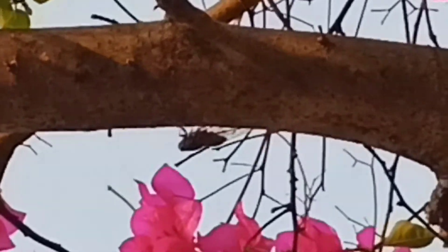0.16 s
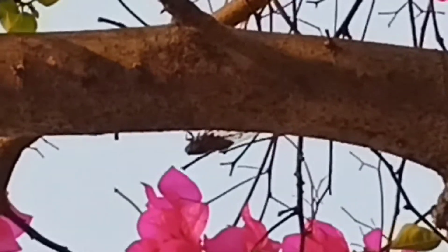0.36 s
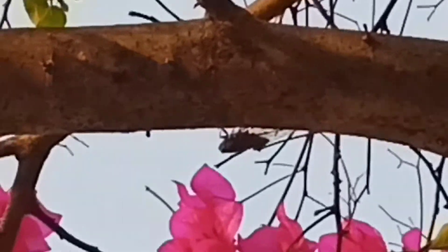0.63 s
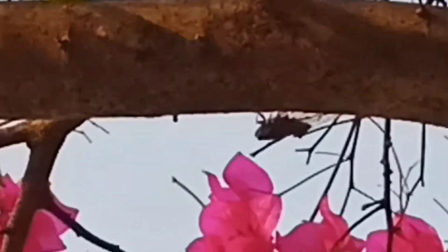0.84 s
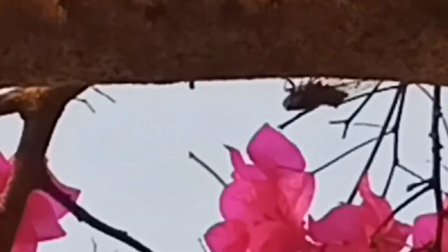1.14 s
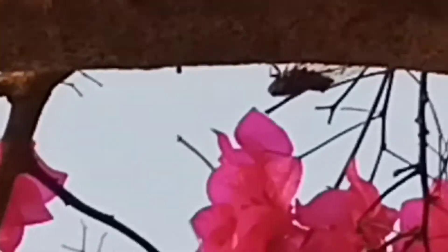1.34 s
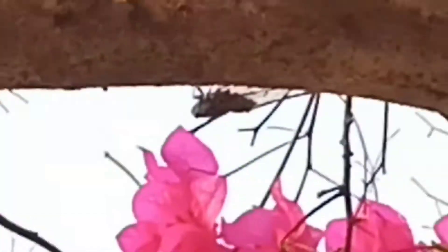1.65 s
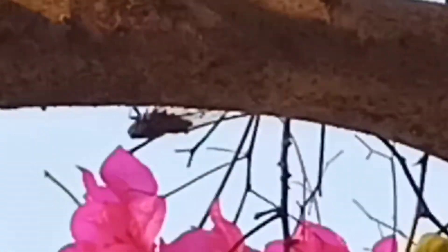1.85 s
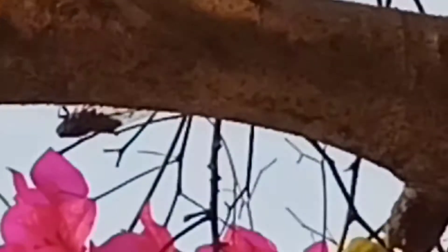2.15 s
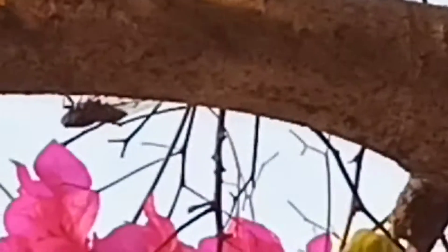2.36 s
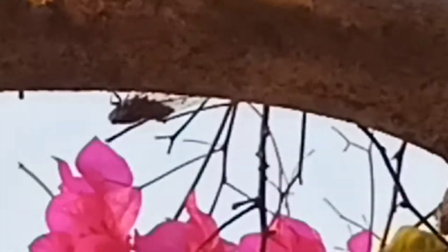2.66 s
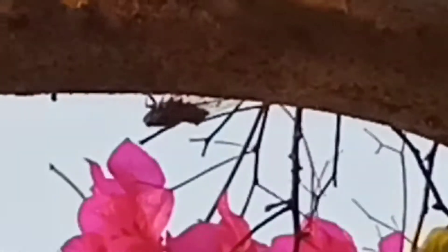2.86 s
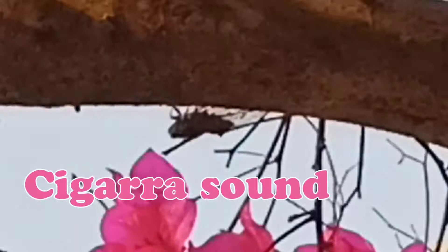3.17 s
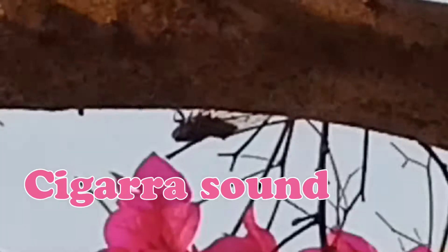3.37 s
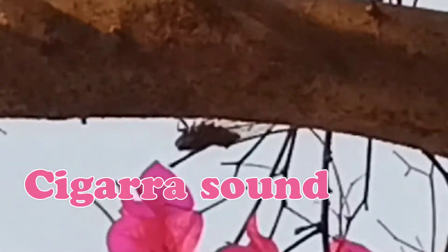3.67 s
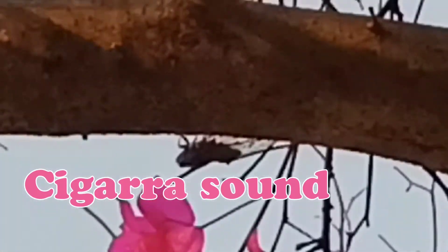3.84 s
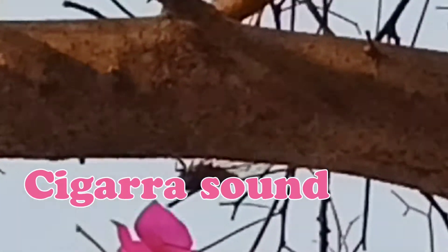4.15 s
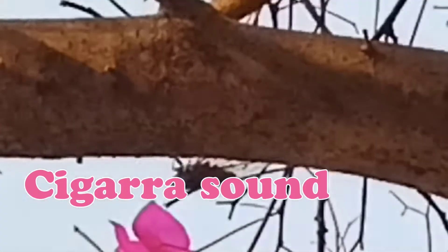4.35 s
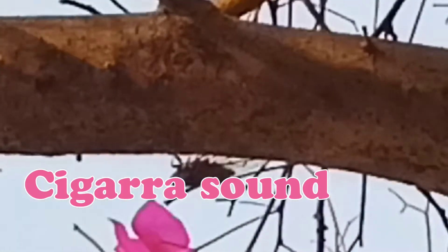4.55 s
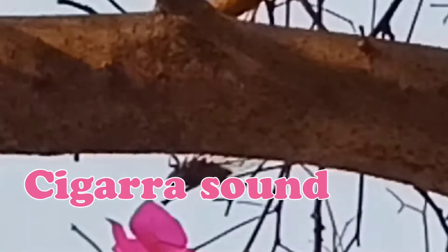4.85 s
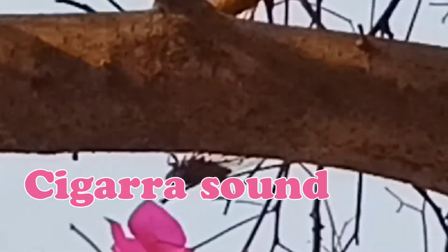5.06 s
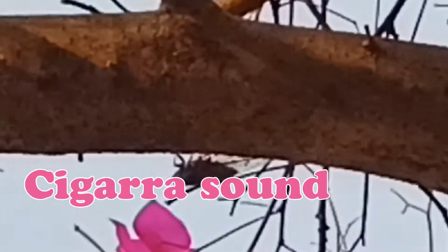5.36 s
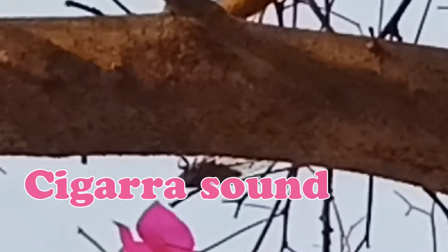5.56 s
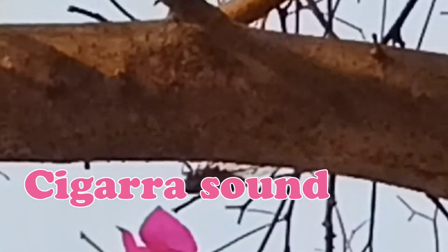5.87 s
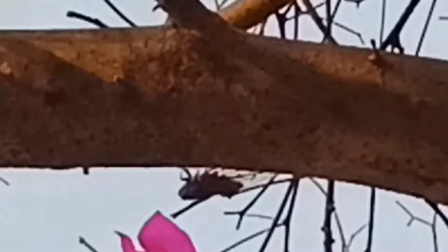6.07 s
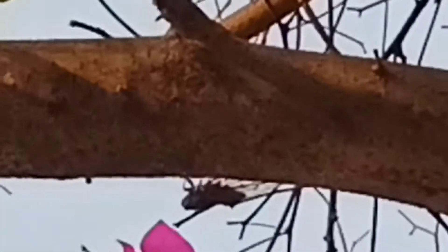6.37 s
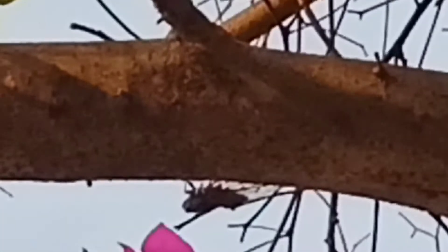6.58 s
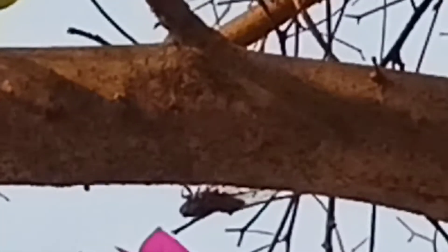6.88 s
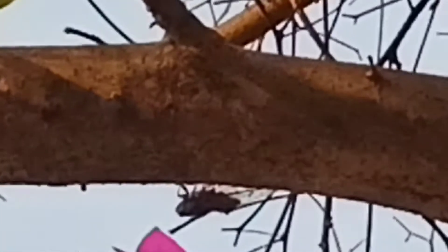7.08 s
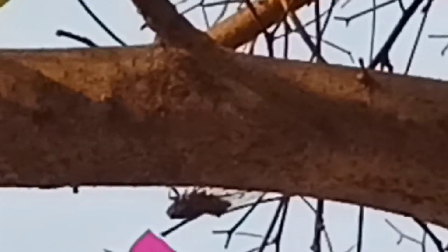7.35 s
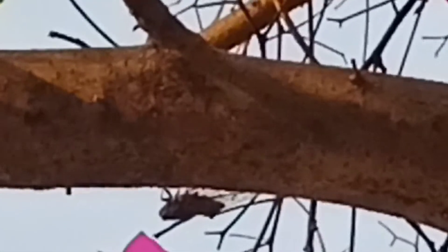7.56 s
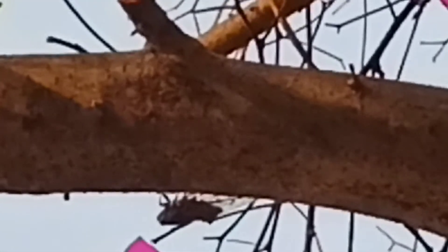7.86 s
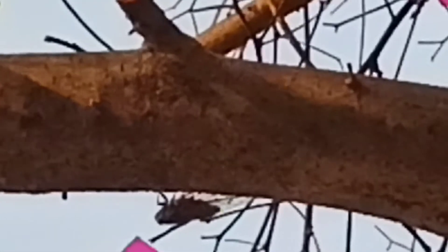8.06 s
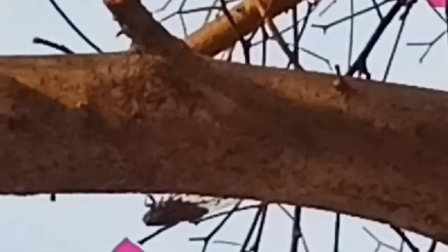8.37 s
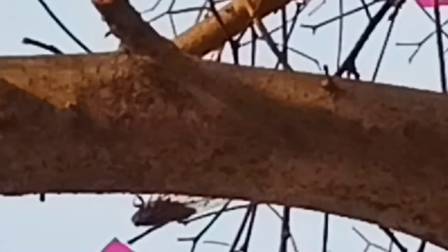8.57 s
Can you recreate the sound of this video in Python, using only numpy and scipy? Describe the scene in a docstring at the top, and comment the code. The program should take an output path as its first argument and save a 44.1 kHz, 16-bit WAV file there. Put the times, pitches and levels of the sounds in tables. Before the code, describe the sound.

A cicada buzzes loudly up close, a high metallic whine growing rougher and throbbing, while a faint small engine approaches far behind.

```python
"""A cicada sings under a branch, close to a mono microphone. Its tymbals buckle rib by rib about
440 times a second and ring the hollow abdomen: first a smooth whine, then ever rougher as the
abdomen throbs and swings the brightness of the buzz. Far behind are a faint drone, a few ticks,
two falling bird whistles, soft rasps, and a small engine that comes nearer along a road."""
import sys
import numpy as np
from scipy import signal
from scipy.fft import rfft, irfft, next_fast_len
from scipy.io import wavfile
from scipy.ndimage import uniform_filter1d, map_coordinates

SR = 44100
rng = np.random.default_rng(int(sys.argv[2]) if len(sys.argv) > 2 else 0)


def store_pcm(level_fs):
    """Save levels as 16-bit WAV."""
    pcm = np.round(np.clip(level_fs, -1, 1) * 32767).astype(np.int16)
    wavfile.write(sys.argv[1], SR, np.atleast_2d(pcm).T)


N = 384552
TIME = np.arange(N) / SR


def amp(db):
    """Decibels to gain."""
    return 10 ** (np.asarray(db) / 20)


def unit(x):
    """x at rms 1."""
    return x / np.sqrt(np.mean(x ** 2) + 1e-20)


def steady(x, size=6000):
    """x with its level ridden to rms 1 over a window of size samples."""
    return x / np.sqrt(np.abs(uniform_filter1d(x ** 2, size)) + 1e-20)


def along(points, hz):
    """(Hz, value) points read on a log frequency axis."""
    point_hz, values = np.transpose(points)
    return np.interp(np.log(hz + 1), np.log(point_hz), values)


def curves(rows):
    """One automation curve for each column after the time."""
    times, *columns = np.transpose(rows)
    return [np.interp(TIME, times, column) for column in columns]


def wobble(rate):
    """A smooth random curve, rate knots a second."""
    knots = rng.standard_normal(int(N * rate / SR) + 4)
    return map_coordinates(knots, [np.arange(N) * rate / SR])


def filtered(x, response):
    """x through an EQ whose gain is response(hz)."""
    size = next_fast_len(N + SR // 2)
    return irfft(rfft(x, size) * response(np.fft.rfftfreq(size, 1 / SR)), size)[..., :N]


def noise(colour):
    """Noise of rms 1 with a (Hz, dB) colour."""
    return unit(filtered(rng.standard_normal(N), lambda hz: amp(along(colour, hz))))


def clicks(at, gains, order=8):
    """Impulses at fractional sample positions."""
    taps = np.floor(at)[:, None] + np.arange(1 - order, order + 1)
    offset = taps - at[:, None]
    shape = np.sinc(offset) * np.cos(np.pi * offset / (2 * order)) ** 2
    slots = np.clip(taps, 0, N).astype(int)
    return np.bincount(slots.ravel(), (gains[:, None] * shape).ravel(), N + 1)[:N]


def tymbal(cycles, rib_hz, strain, slip_s=50e-6, smooth_jitter_s=9e-6, rough_jitter_s=50e-6):
    """Each cycle buckles the ribs one after another; strain makes their timing ragged."""
    # the ribs in buckling order: (smooth level [dB], strained level [dB])
    ribs = [(1, 2), (-1, -10), (-4, -6.5), (-1, -9), (-15, -2.5)]
    smooth_db, strained_db = np.transpose(ribs)
    onsets = np.interp(np.arange(1, int(cycles[-1])), cycles, np.arange(N))
    i = onsets.astype(int)
    rough = strain[i, None]
    shape = (len(i), len(ribs))
    slip = slip_s * (1 + rough) * rng.standard_normal((len(i), 1))
    jitter = (smooth_jitter_s + rough_jitter_s * rough ** 2) * rng.standard_normal(shape)
    delay_s = np.arange(len(ribs)) / rib_hz[i, None] + slip + np.cumsum(jitter, axis=1)
    click_db = smooth_db + (strained_db - smooth_db) * np.sqrt(rough) + 1.35 * rng.standard_normal(shape)
    return clicks((onsets[:, None] + SR * delay_s).ravel(), amp(click_db).ravel())


def abdomen_ring(x, size=2048):
    """The hollow abdomen rings after each click."""
    # how the abdomen radiates: (frequency [Hz], gain [dB])
    body = [(3600, -42.5), (4150, -34), (4600, -28.5), (4800, -20.5), (5050, -10), (5450, -5), (6200, -1.5),
            (6750, 0.5), (7250, 2.5), (7650, 1), (8100, 3), (8500, 0), (9200, -2.5), (9700, -11),
            (10100, -11), (10600, -24), (13000, -39)]
    cepstrum = irfft(np.log(amp(along(body, np.fft.rfftfreq(size, 1 / SR))) + 1e-6))
    # minimum phase, so nothing rings ahead of its click
    cepstrum[1:size // 2] *= 2
    cepstrum[size // 2 + 1:] = 0
    return signal.fftconvolve(x, irfft(np.exp(rfft(cepstrum))))[:N]


def abdomen_opening(x, open_db, strain, size=256, whine_width_hz=200):
    """Opening the abdomen tilts the buzz brighter; under strain the whole tilt sits lower in pitch."""
    # how far each band follows the opening: (frequency [Hz], share [signed ratio])
    tilt = [(5200, -0.38), (6000, -0.34), (7000, -0.64), (8100, 0.06), (8700, -0.049), (9200, 0.56),
            (10100, 0.98), (10900, 0.88), (11800, 0.077)]
    # a narrow resonance sliding with the abdomen's tension: (time [s], centre [Hz], lift [dB])
    whine = [(0.1, 9450, 2), (.3, 9350, 2.5), (1.52, 9130, 3), (1.68, 8850, -3), (2.05, 8655, 2.5),
             (2.4, 7900, 2.5), (4.6, 8596, 3), (5.5, 8600, 2), (8.72, 8466, 3.5)]
    whine_hz, whine_db = curves(whine)
    hz, times, bands = signal.stft(x, SR, nperseg=size)
    i = np.minimum(times * SR, N - 1).astype(int)
    sag = 1 + 0.11 * strain[i] ** 3
    eq_db = open_db[i] * along(tilt, hz[:, None] * sag)
    eq_db += whine_db[i] * np.exp(-((hz[:, None] - whine_hz[i]) / whine_width_hz) ** 2)
    return signal.istft(bands * amp(eq_db), SR, nperseg=size)[1][:N]


def twig_scatter(x, size=256, tail_frames=16):
    """Branch and twigs diffuse a sound: the energy in each band lingers briefly as noise."""
    # decay in the tree: (frequency [Hz], time to fall 60 dB [s])
    decay_times = [(500, .08), (5000, 0.052), (15000, 0.062)]
    hz, times, bands = signal.stft(x, SR, nperseg=size)
    tail = amp(-60 * times[:tail_frames] / along(decay_times, hz)[:, None]) ** 2
    tail /= tail.sum(axis=1, keepdims=True)
    energy = signal.fftconvolve(np.abs(bands) ** 2, tail, axes=1)[:, :len(times)]
    wash = signal.stft(rng.standard_normal(N), SR, nperseg=size)[2]
    return signal.istft(np.sqrt(np.abs(energy)) * wash / wash.std(), SR, nperseg=size)[1][:N]


def through_tree(x):
    """About half of the lower buzz arrives scattered; the upper buzz is mostly direct."""
    # the tree's wet mix: (frequency [Hz], scattered energy [share])
    scattered = [(5000, 0.52), (7000, 0.37), (8500, 0.14), (10000, 0.13)]
    direct = filtered(x, lambda hz: np.sqrt(1 - along(scattered, hz)))
    return direct + filtered(twig_scatter(x), lambda hz: np.sqrt(along(scattered, hz)))


def branch_colour(x):
    """Fixed reflections from the branch colour the buzz with narrow peaks and dips."""
    # peaks and dips: (centre [Hz], width [Hz], gain [dB])
    resonances = [(6550, 45, 2.5), (6700, 90, -7.5), (6730, 37, 5), (7240, 36, 2), (7800, 90, 1),
                  (7710, 80, 2), (8010, 45, 3), (8420, 120, -4.5), (8630, 82, 3), (9070, 55, -3),
                  (9060, 44, 3.5), (9530, 40, 3), (9730, 120, -2.5), (10060, 44, 3.5), (11030, 75, 8.5)]
    peak = lambda hz, centre, width: 1j * hz * width / (centre ** 2 - hz ** 2 + 1j * hz * width)
    eq = lambda hz: 1 + sum((amp(db) - 1) * peak(hz, centre, width) for centre, width, db in resonances)
    return filtered(x, eq)


def sizzle(buzz, throb_phase, strain, edge_db=-22, strain_lift_db=5, spit_db=-19.5):
    """The clicks carry a dry sizzle; strain adds two spits a throb, as the abdomen closes and reopens."""
    # dry edge of the clicks: (frequency [Hz], level [dB])
    edge_colour = [(7000, -30), (10500, -3), (12300, 1.5), (13500, 3.5), (14400, 6), (15500, -2)]
    # thin spit of hard-strained tymbals: (frequency [Hz], level [dB])
    spit_colour = [(11000, -31), (12900, -10), (13500, 0), (13950, -7), (15500, -11.5)]
    grain = np.abs(uniform_filter1d(buzz ** 2, size=12)) ** 0.25
    edge_gain = amp(edge_db + strain_lift_db * strain + wobble(45))
    edge = edge_gain * steady(noise(edge_colour) * steady(grain, size=600))
    spit_gate = np.exp(-((np.cos(throb_phase + 0.15) - 0.46) / 0.38) ** 2)
    return edge + amp(spit_db) * strain ** 4 * unit(noise(spit_colour) * grain * spit_gate)


def cicada(rib_ratio=5.43, rib_drag=0.71, bend_hz=8, pump=0.46, snap=0.29, hum_db=-42):
    """Rib clicks ring the abdomen, whose throb bends their rate, level and colour as strain grows."""
    # tymbal buckling: (time [s], cycle rate [Hz])
    buckling = [(0, 448), (0.5, 433), (1.95, 420.5), (3.25, 443.5), (3.9, 446), (5, 443.5), (5.8, 447),
                (6.3, 454.5), (8.72, 456)]
    # pumping of the abdomen: (time [s], throb rate [Hz])
    throbs = [(0, 17.9), (0.6, 23.65), (1.5, 23.16), (2.2, 23.44), (2.7, 26.81), (3.4, 24.55), (4.3, 24.49),
              (5.4, 19.68), (6.2, 21.13), (7.2, 21.74), (8, 20.06), (8.72, 21.69)]
    # effort of the song: (time [s], level [dB], strain [0-1])
    effort = [(0, -17.5, .72), (.19, -19, .6), (.32, -16.5, .3), (.65, -15.5, 0.21), (1.5, -17, .15),
              (1.72, -17.5, 0.46), (2.08, -15.6, .45), (2.4, -17, 0.61), (5, -17, .63), (5.5, -17.5, .9),
              (6.2, -16.6, .95), (6.95, -18.5, 1), (7.2, -16.4, 1), (7.8, -17.5, .96), (8.72, -17, 0.94)]
    # abdomen posture, driving tilt and pumping: (time [s], opening [dB of drive], swing [dB of drive])
    posture = [(0, 3.5, 4.5), (.3, 4.4, 0.7), (.9, 2, 0.5), (1.52, 3, -0.5), (1.8, -3, 2), (2.5, 1.7, 1.5),
               (3.1, -1.5, 6.5), (4.15, 1.5, 3.5), (5.1, 3, 0.5), (5.4, -0.4, 4), (7.3, -3, 5),
               (8.72, -4.5, 4.2)]
    # single deeper closures of the abdomen: (time [s], dip [dB of drive])
    catches = [(.037, -7), (.143, -6), (4.39, -1), (4.825, -2), (5.145, -7), (5.29, 0)]
    tymbal_hz, = curves(buckling)
    throb_hz, = curves(throbs)
    level_db, strain = curves(effort)
    open_db, swing_db = curves(posture)
    rib_hz = tymbal_hz * (rib_ratio - rib_drag * strain ** 2.53)
    # the abdomen closes once a throb, and the tymbals speed up one radian later
    throb_phase = 2 * np.pi * (0.3 + np.cumsum(throb_hz) / SR)
    closure = np.cos(throb_phase) + snap * strain ** 2 * np.cos(2 * throb_phase)
    catch_db = sum(db * np.exp(-((TIME - at) / 0.022) ** 2) for at, db in catches)
    throb_db = catch_db - swing_db * (1 + 0.12 * wobble(15)) * closure
    bend = strain ** 2 * (np.cos(throb_phase - 1) + 0.755 * wobble(60))
    cycles = np.cumsum(tymbal_hz + bend_hz * bend) / SR
    buzz = steady(abdomen_ring(tymbal(cycles, rib_hz, strain)))
    buzz *= amp(pump * strain ** 2 * throb_db + 0.26 * catch_db)
    buzz = abdomen_opening(buzz, throb_db + open_db, strain)
    song = steady(branch_colour(through_tree(buzz))) + sizzle(buzz, throb_phase, strain)
    # the tymbals' in-and-out motion hums faintly at their own rate
    hum = sum(amp(db) * np.sin(2 * np.pi * k * cycles) for k, db in enumerate([4, 1, -1.5, -3, -3], 1))
    return amp(level_db) * (song + amp(hum_db - 4.1 * strain) * hum)


def far_traffic(level_db=-50.5):
    """Distant traffic blurs into a bed of rumble."""
    # the rumble: (frequency [Hz], level [dB])
    rumble_colour = [(25, -32), (50, -10), (80, -4.5), (145, -3), (175, 0), (205, -5.5), (400, -7),
                     (600, -9.5), (1100, -15.5), (2000, -15.5), (2600, -23), (4000, -16.5), (6000, -40)]
    return amp(level_db + 1.3 * wobble(7.1)) * noise(rumble_colour)


def drone(hz=172.8, level_db=-58.5):
    """A faint low tone wavers in level."""
    return amp(level_db + 3.8 * wobble(3.3)) * np.sin(2 * np.pi * hz * TIME + 0.24 * wobble(4.6))


def approach(nearest_s=8.544, lane_m=2.73, speed_m_per_s=8.23, near_tyre_db=-40.5, near_roar_db=-35):
    """A vehicle draws near along the road: first its tyres rush, then it roars."""
    # tyre rush: (frequency [Hz], level [dB])
    tyre_colour = [(110, -28), (180, -0.5), (341, -3), (423, 3), (463, -1.5), (687, -8.5), (887, -5),
                   (1050, -7), (1280, -2), (1620, -7), (2060, -17), (2690, -12), (3300, -15.5), (3800, -24),
                   (4940, -41), (8360, -120)]
    # close roar: (frequency [Hz], level [dB])
    roar_colour = [(76, -34), (130, -11), (156, -10), (225, -1), (283, -9.5), (380, -5.5), (549, -13),
                   (660, -13), (728, -24), (913, -19), (979, -35), (1930, -11.5), (2290, -20.5),
                   (3800, -19), (4940, -39), (8360, -120)]
    distance_m = np.hypot(lane_m, speed_m_per_s * (TIME - nearest_s))
    tyre_db = near_tyre_db - 0.57 * (distance_m - lane_m)
    roar_db = near_roar_db - 41.5 * np.log10(distance_m / lane_m)
    flutter = amp(1.5 * wobble(7))
    return flutter * (amp(tyre_db) * noise(tyre_colour) + amp(roar_db) * noise(roar_colour))


def engine():
    """The vehicle's small, slow-firing engine putters louder as it nears."""
    # the engine's run: (time [s], firing rate [Hz], level [dB])
    run = [(0, 32, -75), (4.6, 27.5, -59.5), (5.3, 25, -52.5), (6.4, 25.2, -51.5), (7.6, 24.3, -45),
           (8, 26, -46.5), (8.72, 28, -41.5)]
    # exhaust harmonics: (multiple of the firing rate [ratio], relative level [dB])
    harmonics = [(2, -18), (3, -6), (4, 1), (5, 1), (6, -16), (7, -17)]
    firing_hz, level_db = curves(run)
    phase = 2 * np.pi * np.cumsum(firing_hz) / SR
    exhaust = unit(sum(amp(db) * np.cos(k * phase) for k, db in harmonics))
    return amp(level_db + 0.98 * wobble(9.1)) * exhaust


def ticks(rise_s=0.00081):
    """Dry ticks, each a few cycles of one resonance, scattered by the tree."""
    # the ticks: (time [s], peak level [dB], pitch [Hz])
    hits = [(0.1301, -36, 1830), (0.5671, -32, 1860), (0.931, -42, 1704), (1.5075, -35, 1813),
            (1.964, -45, 2200), (2.9033, -39, 2200)]
    direct = np.zeros(N)
    for at, db, hz in hits:
        age = np.maximum(TIME - at, 0)
        envelope = age / rise_s * np.exp(1 - age / rise_s)
        direct += amp(db) * envelope * np.sin(2 * np.pi * hz * age)
    return direct + amp(-5) * twig_scatter(direct)


def birds():
    """Each whistle swells and fades as it slides down, scattered by the tree."""
    # bird whistles: (time [s], length [s], start pitch [Hz], end pitch [Hz], level [dB])
    whistles = [(0.38, 0.33, 3940, 3200, -52), (2.531, 0.19, 4100, 1700, -50)]
    direct = np.zeros(N)
    waver, flutter = wobble(120), wobble(70)
    for at, length, start_hz, end_hz, db in whistles:
        progress = np.clip((TIME - at) / length, 0, 1)
        hz = start_hz * (end_hz / start_hz) ** progress * (1 + 0.0073 * waver)
        envelope = amp(db + 3.3 * flutter) * np.sin(np.pi * progress ** 0.5)
        direct += envelope * np.sin(2 * np.pi * np.cumsum(hz) / SR)
    return direct + amp(-2.5) * twig_scatter(direct)


def rasps():
    """Each far rasp is a soft swell of narrow noise."""
    # the rasps: (centre time [s], half length [s], level [dB])
    swells = [(2.55, .16, -57), (3.2, .1, -62), (4.08, .1, -60), (4.68, .12, -58)]
    # their noise band: (frequency [Hz], level [dB])
    rasp_colour = [(1200, -40), (1750, -5), (1950, 0), (2200, -9), (2800, -40), (5000, -90)]
    envelope = sum(amp(db) * np.exp(-((TIME - at) / half) ** 2) for at, half, db in swells)
    return noise(rasp_colour) * envelope


def scene():
    """The close cicada over its distant backdrop, alike in both channels."""
    mono = cicada() + far_traffic() + drone() + approach() + engine() + ticks() + birds() + rasps()
    return np.array([mono, mono])


def record(dry, top_hz=15550):
    """A brick-wall low-pass takes off the highest treble."""
    return filtered(dry, lambda hz: hz < top_hz)


dry = scene()
out = record(dry)
store_pcm(out)
```